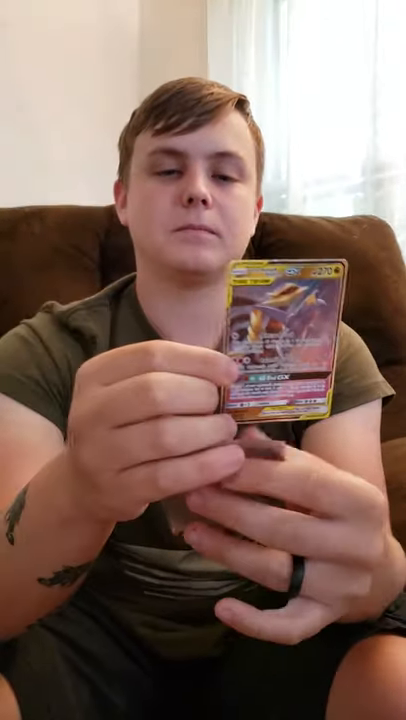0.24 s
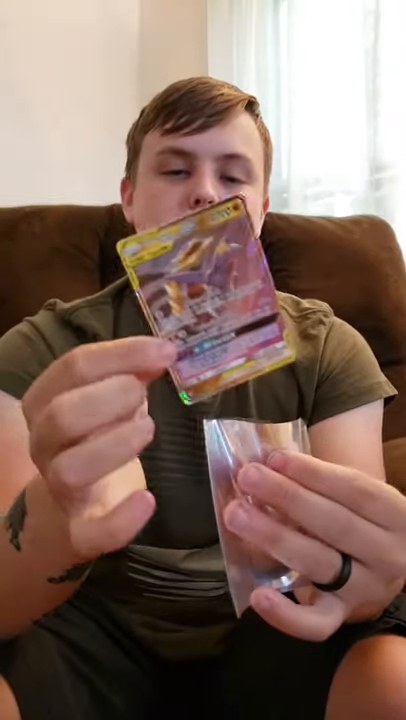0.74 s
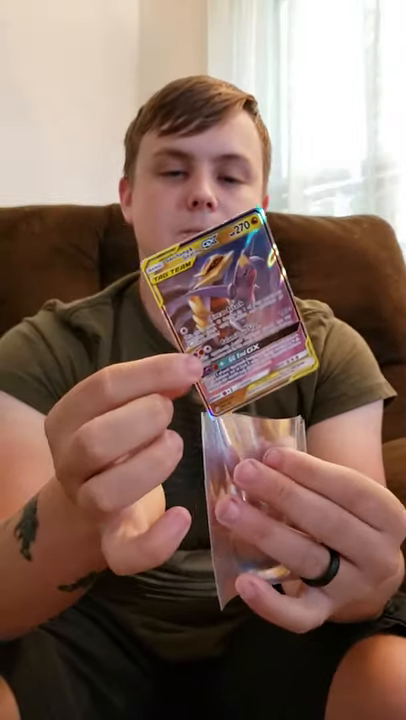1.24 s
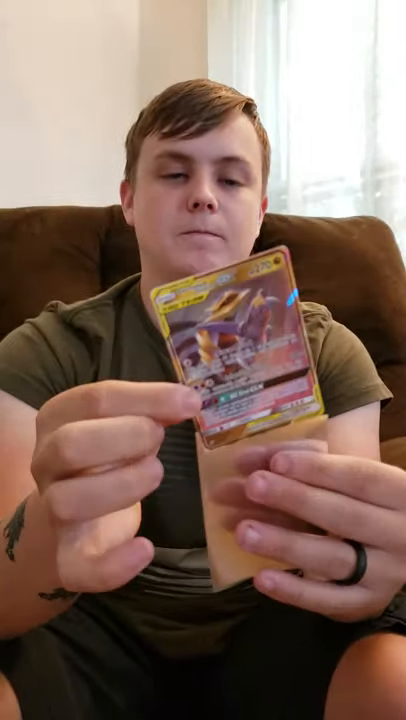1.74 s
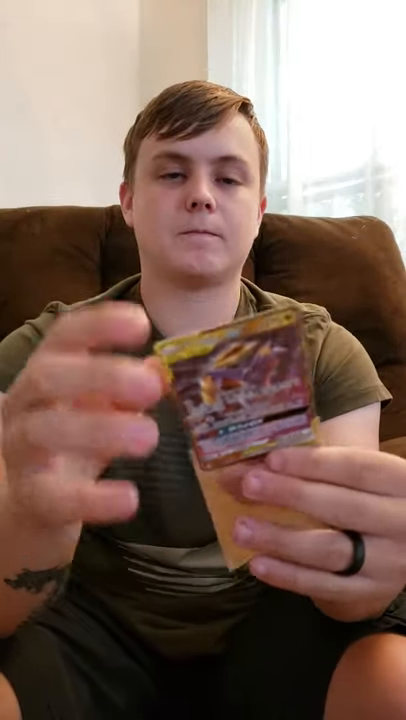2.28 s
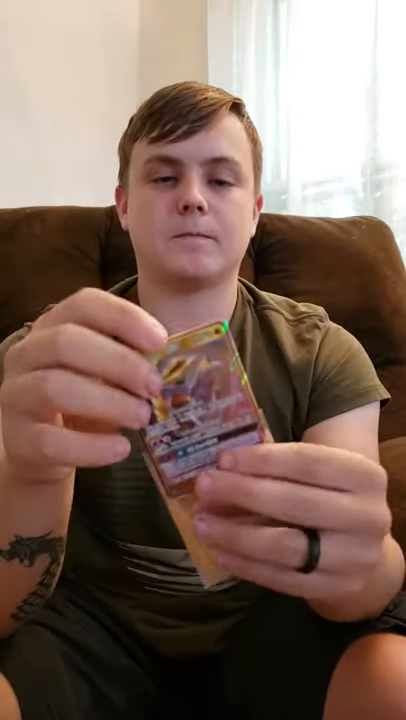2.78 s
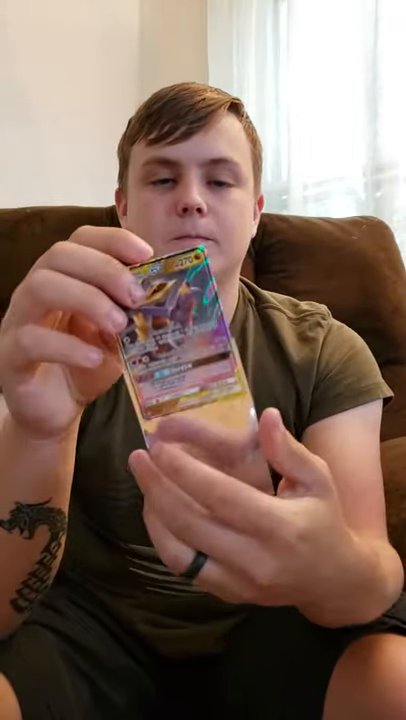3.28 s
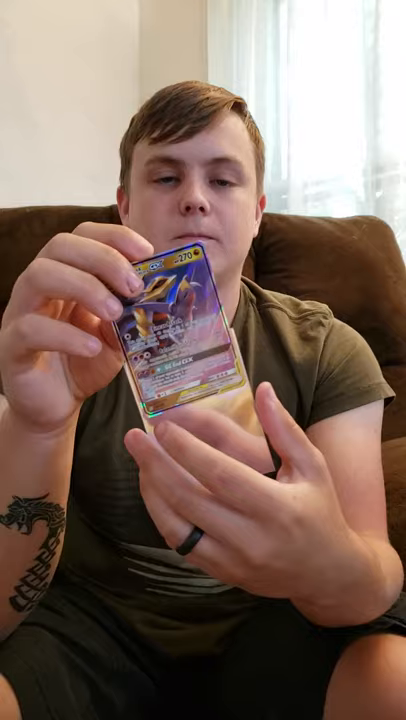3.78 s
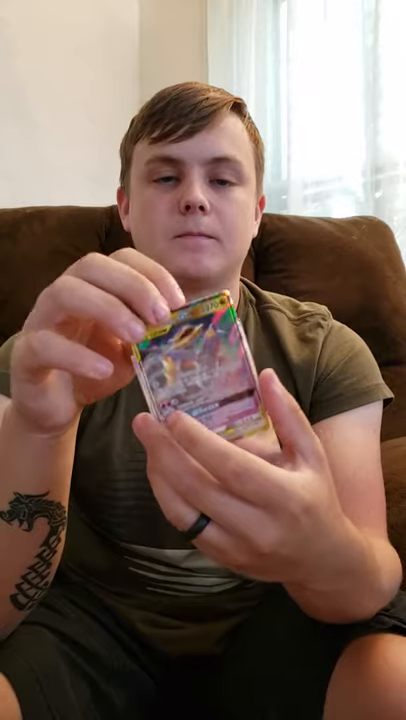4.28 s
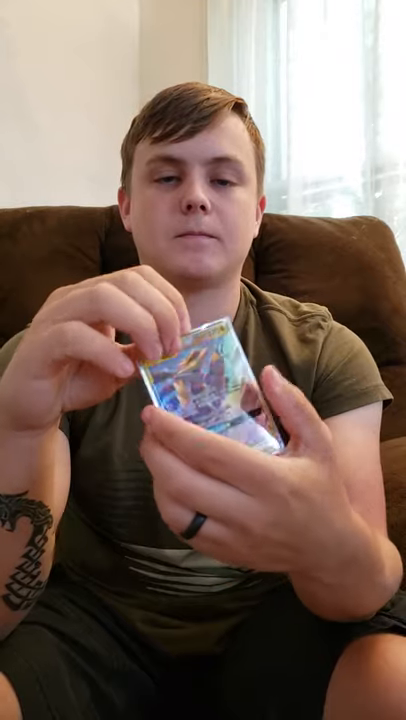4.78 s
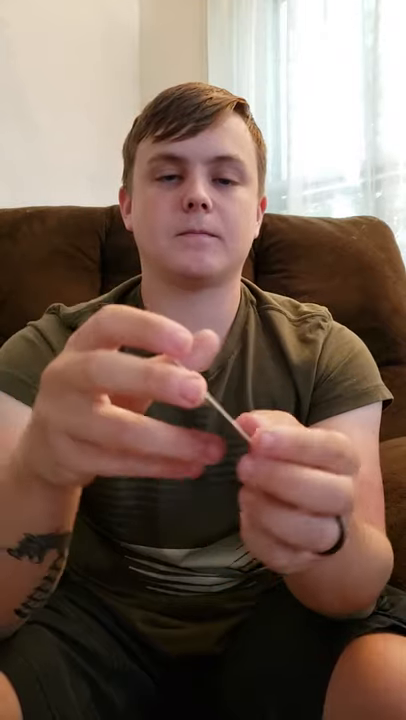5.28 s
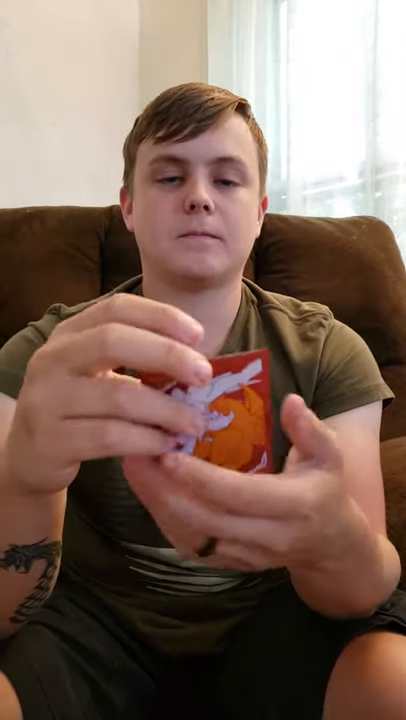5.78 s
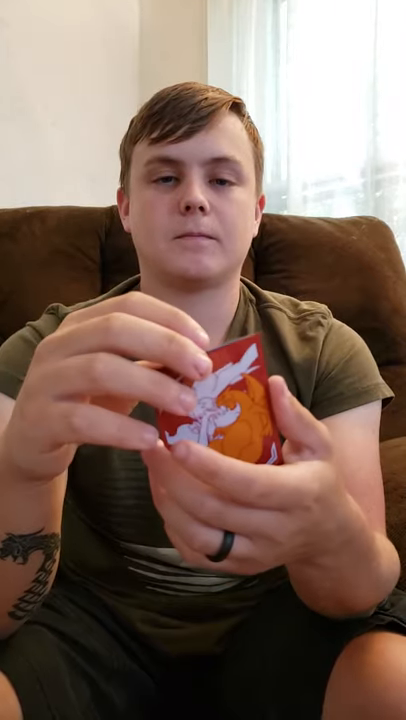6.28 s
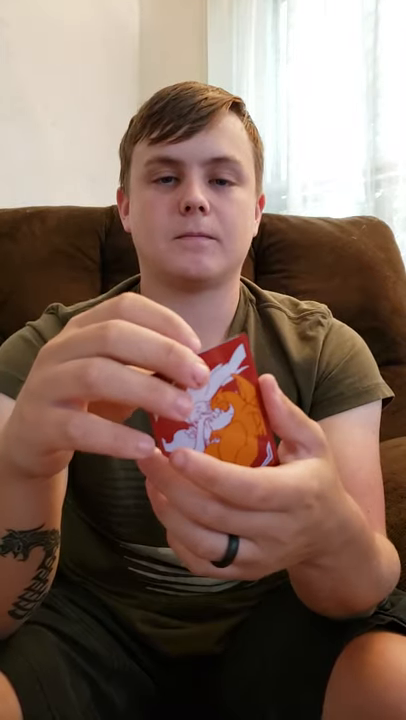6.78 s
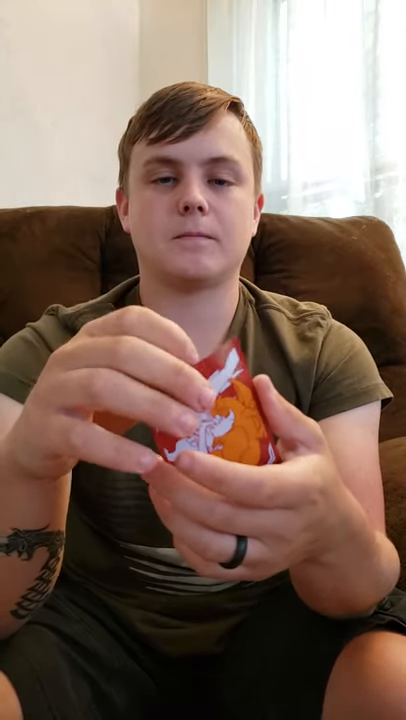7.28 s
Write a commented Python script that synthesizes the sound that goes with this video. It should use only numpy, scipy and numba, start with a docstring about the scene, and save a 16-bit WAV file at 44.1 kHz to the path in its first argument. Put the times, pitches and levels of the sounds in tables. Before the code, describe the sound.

In a quiet living room, a card slides into thin plastic very close to the microphone. The strongest scrape and snap come just after half a second, then smaller rustles and dry ticks, one crisp click near three seconds, and soft scattered rubbing. Underneath, a deep wavering hum and dull rumble continue, with a muffled engine outside growing through the second half. Faint hiss, slight room echo, handling toward the right.

```python
"""Card slid into a plastic sleeve

Fingers slide a card into a thin plastic sleeve close to a phone in a quiet living room.
The film whispers as it rubs (shaped noise) and ticks where it buckles (short fading rings), with a faint echo.
Outside, an engine drones nearer (a stack of wavering tones) over a low rumble (dulled noise).
A deep hum near 40 Hz, narrow noise of the room, is imitated by one tone with irregular pitch and level.
The two microphones hiss faintly (noise).
"""
import sys
import numpy as np
from scipy import signal
from scipy.fft import rfft, irfft, next_fast_len
from scipy.io import wavfile
from scipy.ndimage import uniform_filter1d
from numba import njit

SR = 44100
rng = np.random.default_rng(int(sys.argv[2]) if len(sys.argv) > 2 else 0)


def unload_wav(signal):
    """Save mono or channel-first audio to the path in sys.argv[1] as 16-bit WAV at rate SR, clipped to [-1, 1]."""
    wavfile.write(
        sys.argv[1],
        SR,
        np.round(np.clip(np.atleast_2d(signal).T, -1, 1) * 32767).astype(np.int16),
    )


N = 332630  # samples, about 7.54 s

# strokes of card on film: (full pressure from [s], rise [s], hold [s], fall [s], film whisper [dB],
# card body [dB], card edge [dB], finest sizzle [dB], left minus right [dB], ring of the free card span [Hz])
STROKES = [(0.0, .05, 0.059, 0.084, -73, -75, -81, -77.5, -8.5, 1910),
           (0.134, 0.027, 0, .1, -75.5, -91, -83, -81, -16, 2290),
           (0.162, 0.022, 0, 0.021, -74, -65.5, -84, -84, -8, 1260),
           (0.202, .04, 0, 0.075, -81.5, -71.5, -81, -88, -10.5, 1740),
           (0.382, 0.02, 0.0081, .04, -80, -69, -90, -88, -9, 1880),
           (0.41, 0.011, 0.046, .05, -74.5, -70, -73.5, -77, -11, 1960),
           (0.447, 0.015, 0.017, 0.017, -67.5, -59.5, -62.5, -63.5, -14.5, 1940),
           (0.479, .021, 0.012, 0.086, -81, -76, -80, -76, -11, 2050),
           (0.563, 0.0092, 0.021, 0.046, -52.5, -69, -61, -54.5, -8, 2080),
           (0.598, 0.033, 0.003, .025, -55, -51, -54, -54.5, -2.5, 2000),
           (0.618, .03, 0.012, 0.041, -65, -57, -62.5, -68, -8, 2630),
           (0.66, 0.061, 0.043, 0.073, -78, -71, -74.5, -88, -4, 2560),
           (1.378, 0.063, 0.072, .05, -81, -83, -81.5, -98, -11, 2070),
           (1.513, 0.052, 0, 0.073, -68, -70.5, -67, -81, -9, 1850),
           (1.624, 0.022, 0.012, 0.064, -70, -70.5, -73.5, -75, -11, 1940),
           (1.645, 0.017, 0.0083, .02, -83, -71, -84, -75, -7, 1730),
           (1.71, .012, 0.0069, .015, -74, -70, -74.5, -66, -4, 2220),
           (2.145, 0.21, 0, 0.15, -89.5, -98, -100, -80.5, -13, 2208),
           (2.301, 0.019, 0.00076, 0.036, -98, -79, -88, -90, -8, 1294),
           (2.675, 0.018, .012, .05, -80, -75, -79, -72, -10, 1930),
           (2.705, 0.097, 0.016, 0.079, -77, -81, -79.5, -71, -10, 2500),
           (2.925, 0.029, 0.018, 0.14, -77, -83, -81, -71, -13, 1455),
           (3.05, 0.12, 0, .1, -80, -80, -100, -76, -4, 1672),
           (3.215, 0.041, 0.036, .04, -83.5, -80, -86, -86, -5, 2260),
           (3.372, 0.11, 0.074, 0.14, -87.5, -83.5, -95, -92, -3, 2260),
           (3.636, 0.054, 0, .06, -79.5, -73, -101, -100, -3, 2150),
           (4.009, 0.071, 0.026, 0.17, -74, -82.5, -96, -69.5, -5.5, 2270),
           (4.121, 0.097, 0, 0.089, -64.5, -75, -82, -66.5, -4, 2460),
           (4.266, 0.17, 0.0038, 0.087, -69.5, -80, -93, -75, -4, 2276),
           (4.355, .06, 0.044, .1, -64, -81, -82.5, -67.5, -3, 2410),
           (4.452, 0.054, 0.052, .05, -73.5, -87, -85, -88, -2, 2290),
           (4.681, 0.037, 0, 0.046, -82, -81, -86, -88, -4, 1950),
           (4.745, .021, 0, .03, -90, -83, -88, -82, 1, 2318),
           (4.815, 0.097, 0.0078, 0.068, -79.5, -82, -92, -79, -4, 2140),
           (4.899, 0.013, 0.0041, 0.12, -85, -83, -98, -82, -2, 2066),
           (5.037, 0.064, 0.0027, 0.29, -86, -85, -95, -82, -4, 1540),
           (5.103, 0.027, 0, 0.039, -75.5, -88, -79, -79, -6, 2001),
           (5.245, 0.0065, 0.025, .08, -69, -85, -83, -68.5, -3, 1808),
           (5.368, 0.041, 0, 0.066, -76, -82, -79, -74, -5, 1937),
           (5.422, 0.046, 0, .03, -78, -76.5, -79, -71, -8, 2250),
           (5.45, .03, 0.021, 0.075, -79.5, -84, -87, -78, -11, 2100),
           (5.587, 0.056, 0, .13, -80, -91, -85, -79, -9, 2020),
           (5.784, 0.0098, 0.0083, 0.089, -67, -74.5, -79, -62.5, -9, 1795),
           (5.836, .04, 0.0083, 0.027, -72, -73, -79, -66.5, -9.5, 1850),
           (6.726, .012, .014, 0.063, -80, -85, -93, -91, -6, 1350),
           (7.146, 0.087, 0, 0.091, -83, -87.5, -83, -91, -3.5, 1540),
           (7.483, 0.044, 0, 0.093, -68, -77, -73, -78, -5, 1890)]
# tone colour of the rubbing: (frequency [Hz], level per Hz [dB])
RUB_COLOUR = [(600, -2), (900, -12.5), (1500, -18), (3200, -20), (4000, -9), (5400, -9.5), (6500, -5.5),
              (7600, -8.5), (8700, -25), (10000, -10.5), (12200, -1), (13500, -7), (15800, -16.5)]
# bands of whisper, body, edge and sizzle: (from [Hz], to [Hz])
RUB_BANDS = [(5300, 8800), (600, 3200), (3200, 5300), (8800, 17000)]
# sideways step in each of these bands, largest in whisper and sizzle, smallest in edge:
# (share of the left-right step [ratio])
RUB_SIDEWAYS = [1.2, 0.56, 0.24, 1.1]
# levels of strong engine tones; before about 3 s they are mostly irregular noise, later the engine grows:
# (time [s], multiple 5 [dB], multiple 7 [dB], multiple 8 [dB], multiple 9 [dB])
ENGINE_LEVELS = [(0.0, -69, -71, -79, -71), (0.59, -54.5, -61.5, -61, -61.5), (0.97, -62, -72, -74, -72.5),
                 (1.45, -53.5, -58, -67, -57.5), (1.9, -63.5, -60, -65, -61.5),
                 (2.5, -63, -56, -62.5, -64.5), (2.85, -63, -70, -57, -59), (3.3, -53, -60.5, -61, -65),
                 (3.8, -50.5, -56, -60, -59), (4.22, -47.5, -49, -58, -62.5),
                 (4.62, -54, -63.5, -61.5, -56), (4.98, -50, -52, -67, -58.5),
                 (5.46, -54, -51, -64.5, -54.5), (5.96, -48.5, -45.5, -56, -60),
                 (6.6, -51, -45, -51.5, -50.5), (7.1, -46.5, -44, -44.5, -51),
                 (7.31, -43.5, -55, -45.5, -55), (7.54, -42, -43, -45, -53)]
# which multiples those are: (multiple of the cycle rate [count])
STRONG_MULTIPLES = (5, 7, 8, 9)
# all engine tones: (multiple [count], level against the strong ones, before weak_db [dB]);
# the strong ones take their levels from ENGINE_LEVELS instead
MULTIPLES = [(1, -25.5), (2, -19.5), (3, -21.5), (4, -1), (5, 0), (6, -9.5), (7, 0), (8, -2), (9, -3),
             (10, -8.5), (11, -15.5), (12, -10.5), (13, -15), (14, -20), (15, -20), (16, -17.5), (17, -25),
             (18, -29), (19, -18), (20, -20.5), (21, -26.5), (22, -36), (23, -21.5), (24, -32), (25, -28.5)]
# speed of the engine: (time [s], cycle rate [Hz])
ENGINE_CYCLE = [(0, 15.4), (1.5, 16.4), (2.8, 16), (4.2, 15.95), (6.0, 15.6), (7.54, 16.05)]
# irregular course of the deep hum: (time [s], pitch [Hz], level before its random waver [dB])
HUM = [(0.0, 39.86, -55), (0.46, 39.94, -46), (0.99, 37.93, -55.5), (1.09, 39.4, -49.5),
       (1.38, 41.76, -49.5), (1.8, 39.57, -51), (1.93, 38.4, -69), (1.97, 38.1, -50), (2.33, 38.27, -52.5),
       (2.58, 42.33, -60), (2.71, 39.6, -48), (3.42, 39.96, -54), (3.76, 39.6, -45.5), (4.05, 38.24, -66),
       (4.3, 39.38, -47), (4.85, 39.9, -49), (4.98, 42.5, -56), (5.27, 40.7, -46), (5.5, 39.15, -52.5),
       (6.49, 41.38, -55), (6.57, 41.23, -42), (7.16, 41.1, -59.5), (7.29, 43.77, -62), (7.54, 37.4, -49)]
# growth of the rumble: (time [s], level of its 160-700 Hz part before gain_db [dB])
RUMBLE_SWELL = [(0, -56.5), (3, -56), (5.9, -56.5), (6.8, -53), (7.2, -53.5), (7.54, -52)]
# tone colour of the rumble: (frequency [Hz], level per Hz [dB])
RUMBLE_COLOUR = [(20, -40), (30, -17.5), (40, -8), (51, -7), (65, -7), (151, -10), (174, -16), (205, -11),
                 (240, -13.5), (264, -21), (400, -23), (434, -24), (462, -24.5), (610, -30), (720, -43),
                 (944, -50.5), (1400, -62.5)]
# left-right balance of all the low sounds: (frequency [Hz], left minus right [dB])
LOW_BALANCE = [(60, -0.5), (380, 1.5), (520, -5), (700, -9), (1300, -0.5)]
# part of the rumble unlike in the two microphones: (frequency [Hz], level against the shared part [dB])
RUMBLE_SIDE = [(40, -9), (250, -18.5), (600, -12), (1200, 7)]
# buckling ticks: (time [s], peak of a ring at the favoured pitch [dB], favoured pitch [Hz],
# loss per octave below it [dB], loss per octave above it [dB], left minus right [dB],
# change at each after-crack, where above zero counts as zero [dB])
TICKS = [(0.0312, -62, 4000, 3.7, 4, -12, -18), (0.1253, -59, 7500, 6.9, 2, -15, -13),
         (0.1579, -49, 1780, 9.1, 22, -11, -17), (0.196, -61, 3350, 14, 8, -7, -1),
         (0.2276, -66.5, 790, 3, 3, -7, -6), (0.366, -61, 2560, 9.1, 4, -10, -5),
         (0.378, -55.5, 795, 5, 14, -9, -10), (0.4074, -58, 2150, 12, 11, -13, -3),
         (0.5832, -30, 2170, 17.5, 6.7, -7, -10), (0.6952, -49, 2830, 25, 9, -3, -2),
         (1.4995, -62, 2800, 2.9, 10, -6, -0.5), (1.5128, -52, 4520, 25, 21, -10, 0),
         (1.6215, -60, 7000, 6, 10, -10, -13), (1.7094, -60.5, 12000, 3, 4, -8, -0.5),
         (2.2962, -69, 2100, 8.6, 4.4, -7, 0), (2.645, -60.5, 2680, 31, 6.4, -8, -9),
         (2.6729, -56.5, 4400, 4.4, 3, -9, -10), (2.9223, -31, 7250, 35, 7, -10, -12),
         (3.032, -63.5, 1790, 1.5, 17, 0, -16), (3.1555, -65, 6920, 3, 7, 0, -15),
         (3.63, -64, 2140, 15, 4, -1, 2), (4.0218, -63.5, 2200, 18, 1.5, -10, -13),
         (4.6675, -71, 6020, 3.86, 8, -1, -13), (5.2549, -53, 12000, 9.7, 5, -12, -4.5),
         (5.3543, -51.5, 8500, 7.2, 2.3, -5.5, -1.5), (5.4417, -62, 12200, 9, 5, -13, -13),
         (5.563, -64.5, 2670, 26, 2.15, -11, 1.5), (5.7633, -64, 12000, 3, 4.9, -10, -2),
         (6.7284, -62.5, 6960, 14, 13, -10, -12), (7.4392, -58, 4434, 14, 12, -1, -9),
         (7.4677, -46.5, 5210, 12.5, 7.3, -6, 3)]
# groups of rings in card and film, dull to bright: (pitch before detuning [Hz], level in its group [dB], 60 dB fade [s])
RINGS = [
    [(786, 0, 0.023)],
    [(1170, 0, 0.0058)],
    [(1930, 10.5, 0.0043), (2060, 5, 0.0043)],
    [(2683, 0, 0.0024)],
    [(3980, 6, 0.0017), (4570, 12, 0.0024)],
    [(5550, -14.5, 0.011), (7200, 12.5, 0.0024)],
    [(11300, -1.5, .003), (12900, -1, 0.0023)],
]
# fading of the echo: (frequency [Hz], time to fade by 60 dB [s])
ROOM_FADE = [(800, 0.37), (4000, 0.22), (12000, 0.29)]
# tone colour of the microphone hiss: (frequency [Hz], level per Hz [dB])
HISS_COLOUR = [(530, -38.5), (900, -13), (1050, -8.5), (1510, -8), (1920, -9.5), (2110, -8.5), (4710, -14),
               (6830, -17.5), (8270, -22.5), (14900, -7), (15800, -9.5)]

HISS_DB = -76.5  # rms level before the top is cut
TOP_HZ = 15830  # treble limit
LEFT_LAG = 2  # samples
STROKE_RANGE_DB = 20  # a stroke climbs this much in its rise time and loses it in its fall time
DETUNE = .015  # spread of a ring's pitch from tick to tick, as a share of the pitch
WEAKEST_RING_DB = -31.5  # lowest a ring group may fall against the tick's peak setting
DULL_SIDEWAYS = 0.66  # share of the left-right step in the four dullest ring groups


def undb(db):
    """Turn decibels into a gain."""
    return np.exp(np.asarray(db) * (np.log(10) / 20))


def level(x, db=0):
    """Scale a sound to an rms level."""
    return x * undb(db) / np.sqrt(np.mean(x ** 2))


def curve(rows):
    """Join each column of a table by straight lines in time."""
    s, *columns = np.transpose(rows)
    return [np.interp(np.arange(N) / SR, s, c) for c in columns]


def colour(x, points, lo=0, hi=SR):
    """Shape the spectrum by (Hz, dB) points and keep only lo to hi."""
    n, margin = x.shape[-1], 4096
    # mirrored margins keep the ends free of clicks
    before = 2 * x[..., :1] - x[..., margin:0:-1]
    after = 2 * x[..., -1:] - x[..., -2:-margin - 2:-1]
    x = np.concatenate([before, x, after], -1)
    size = next_fast_len(x.shape[-1], True)
    hz = np.arange(size // 2 + 1) * SR / size + 1  # 1 Hz up, so the logarithm exists
    at, db = np.transpose(points)
    gain = undb(np.interp(np.log(hz), np.log(at), db))
    edges = 1 / np.sqrt((1 + (lo / hz) ** 48) * (1 + (hz / hi) ** 48))
    return irfft(rfft(x, size) * gain * edges, size)[..., margin:margin + n]


def walk(rate):
    """Random levels held for 1 / rate seconds and smoothed twice; spread near 1."""
    k = int(SR / rate)
    steps = np.repeat(rng.standard_normal(N // k + 1), k)
    return np.sqrt(2) * uniform_filter1d(uniform_filter1d(steps, k), k)[:N]


def place(x, pan_db):
    """The hands are nearer the right microphone, so the left hears them later."""
    left = np.roll(x, LEFT_LAG) * undb(pan_db / 2)
    return np.array([left, x * undb(-pan_db / 2)])


def strokes():
    """Each stroke's pressure rises, holds and falls; overlapping strokes add in power."""
    t = np.arange(0, N / SR, .001)
    power = 1e-12
    for s, rise_s, hold_s, fall_s, *band_db, _, _ in STROKES:
        early = (s - t) / max(rise_s, .004)
        late = (t - s - max(hold_s, 0)) / max(fall_s, .004)
        away = np.maximum(np.maximum(early, late), 0)
        power = power + undb(np.array(band_db)[:, None] - STROKE_RANGE_DB * away) ** 2
    # side and ring glide from one stroke to the next
    pan_db, span_hz = curve([(row[0], *row[-2:]) for row in STROKES])
    return curve(np.c_[t, np.sqrt(power).T]), pan_db, span_hz


@njit
def resonance(x, hz, width):
    """State-variable band-pass: rings at a moving pitch, with gain 1 there."""
    y, b, l = np.empty(len(x)), 0., 0.
    for i in range(len(x)):
        g, k = np.tan(np.pi * hz[i] / SR), width / hz[i]
        v = (b + g * (x[i] - l)) / (1 + g * (g + k))
        b, l, y[i] = 2 * v - b, l + 2 * g * v, k * v
    return y


def rubbing(grain_db=0.5, flicker_db=1., own_db=1.0, crinkle_rate=200, crinkle_db=3.5,
            unlike=2.4, span_db=15, span_width_hz=320.0):
    """Dense slips of uneven size along the contact; each band follows its own pressure."""
    pressures, pan_db, span_hz = strokes()
    # now and then a crease gives way: a boosted slip half a millisecond long
    crinkles = (rng.random(N) < crinkle_rate / SR) * undb(crinkle_db * rng.random(N))
    slips = undb(grain_db * walk(900) + flicker_db * walk(90))
    slips = slips + np.convolve(crinkles, np.hanning(24))[:N]
    paths = []
    for x in slips * rng.standard_normal((3, N)):
        # the card between fingers and sleeve rings along, with one overtone
        ring = resonance(x, span_hz, span_width_hz)
        overtone = 0.35 * resonance(x, 1.3 * span_hz, span_width_hz)
        paths.append(x + undb(span_db) * (ring + overtone))
    paths = np.array(paths)
    out = 0
    for (lo, hi), pressure, share in zip(RUB_BANDS, pressures, RUB_SIDEWAYS):
        shared, left, right = level(colour(paths, RUB_COLOUR, lo, hi))
        gain = pressure * undb(own_db * walk(150)) / np.sqrt(1 + unlike ** 2)
        step_db = share * pan_db
        # a wide contact reaches each microphone partly by its own path
        separate = np.array([left * undb(step_db / 2), right * undb(-step_db / 2)])
        out = out + place(shared * gain, step_db) + unlike * gain * separate
    return out


def engine(waver_db=3.5, weak_db=-3, strong_waver_db=1.5, unsteady=0.006035):
    """Uneven firing puts a tone on every multiple of the cycle; weak ones follow the strong ones' mean power."""
    (hz,), strong_db = curve(ENGINE_CYCLE), curve(ENGINE_LEVELS)
    phase = 2 * np.pi * np.cumsum(hz * (1 + unsteady * walk(5))) / SR
    mean = np.sqrt(uniform_filter1d(np.mean(undb(strong_db) ** 2, 0), SR // 2))
    out = 0
    for k, db in MULTIPLES:
        if k in STRONG_MULTIPLES:
            own = undb(strong_db[STRONG_MULTIPLES.index(k)] + strong_waver_db * walk(6))
        else:
            own = mean * undb(db + weak_db + waver_db * walk(4))
        out = out + np.sqrt(2) * own * np.sin(k * phase + rng.uniform(0, 2 * np.pi))
    return out


def hum(waver_db=1.5):
    """A deep hum near 40 Hz, narrow noise of the room, imitated by one tone with irregular pitch and level."""
    hz, db = curve(HUM)
    gain = np.sqrt(2) * undb(db + waver_db * walk(8.8))
    return gain * np.sin(2 * np.pi * np.cumsum(hz) / SR)


def rumble(gain_db=0):
    """Outdoor noise dulled by the walls, growing as the engine nears; a second part differs left and right."""
    mid, side = colour(rng.standard_normal((2, N)), RUMBLE_COLOUR, 0, 1700)
    spread = np.std(colour(mid, [(1, 0)], 160, 700))
    scale = undb(curve(RUMBLE_SWELL)[0] + gain_db) / spread
    return mid * scale, colour(side, RUMBLE_SIDE) * scale


def ticks(rise_s=0.0004, after_s=0.0016):
    """Each buckle strikes the same short rings, hardest near its own pitch, then cracks twice more."""
    out, t = np.zeros((2, N + SR)), np.arange(SR // 20) / SR
    chance = rng.standard_normal((len(TICKS), 16))
    for (s, peak_db, centre_hz, below_db, above_db, pan_db, after_db), c in zip(TICKS, chance):
        draws, tick = iter(c), 0
        for k, modes in enumerate(RINGS):
            loudest_hz = max(modes, key=lambda mode: mode[1])[0]
            octaves = np.log2(loudest_hz / centre_hz)
            loss_db = min(below_db * octaves, -above_db * octaves)
            db = peak_db + max(loss_db, WEAKEST_RING_DB)
            ring = 0
            for hz, mode_db, t60 in modes:
                wave = np.sin(2 * np.pi * hz * (1 + DETUNE * next(draws)) * t)
                ring = ring + undb(mode_db) * wave * np.exp(-np.log(1000) * t / t60)
            ring = ring * (1 - np.exp(-t / rise_s))
            sideways = DULL_SIDEWAYS if k < 4 else 1
            tick = tick + place(undb(db) * ring / np.abs(ring).max(), pan_db * sideways)
        for n in range(3):
            at = int((s + n * after_s * (1 + 0.18 * next(draws))) * SR)
            out[:, at:at + len(t)] += tick * undb(n * min(after_db, 0))
    return out[:, :N]


def room(x, delay_s=0.0038):
    """A diffuse tail of fading noise, different at each microphone, fading fastest around 4 kHz."""
    t, tail = np.arange(SR // 2) / SR, 0
    fade_hz, fade_s = np.transpose(ROOM_FADE)
    for hz in 700 * 2. ** np.arange(5):  # octave bands
        t60 = np.interp(np.log(hz), np.log(fade_hz), fade_s)
        band = colour(rng.standard_normal((2, len(t))), [(1, 0)], hz / np.sqrt(2), hz * np.sqrt(2))
        tail = tail + band * np.exp(-np.log(1000) * t / t60)
    tail = tail * np.clip(t / delay_s - 1, 0, 1)  # silent for delay_s, then opens over as long again
    tail = tail / np.sqrt(np.sum(tail ** 2) / 2)
    return signal.oaconvolve(x[None], tail, axes=1)[:, :N]


def scene():
    """Hands in front, their echo, and the low sounds that fill the room."""
    rubs, clicks = rubbing(), ticks()
    echo = room(undb(-12.5) * rubs.mean(0) + undb(-7) * clicks.mean(0))
    mid, side = rumble(gain_db=-1.5)
    tones = engine() + hum()
    # a faint copy of the tones, 90 samples late, is added on the left and subtracted on the right
    side = side + undb(-20.5) * np.pad(tones, (90, 0), "edge")[:N]
    low = []
    for sign in (1, -1):  # left, right
        balance = [(hz, sign * db / 2) for hz, db in LOW_BALANCE]
        low.append(colour(mid + tones + sign * side, balance))
    return rubs + clicks + echo + np.array(low)


def record(dry):
    """Each microphone adds its own hiss; a steep filter cuts the top."""
    hiss = level(colour(rng.standard_normal((2, N)), HISS_COLOUR, 700), HISS_DB)
    top_cut = signal.ellip(12, .2, 80, TOP_HZ, fs=SR, output="sos")
    return signal.sosfilt(top_cut, dry + hiss)


dry = scene()
out = record(dry)
unload_wav(out)
```